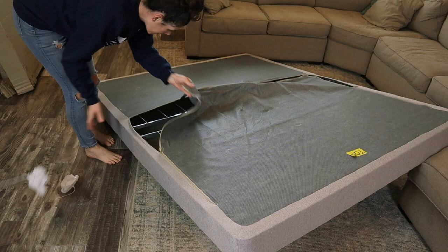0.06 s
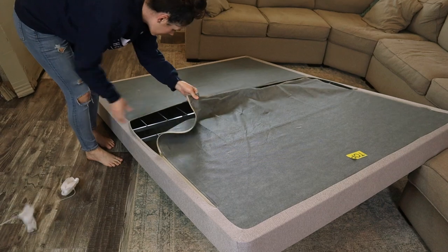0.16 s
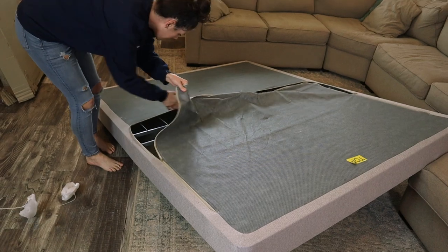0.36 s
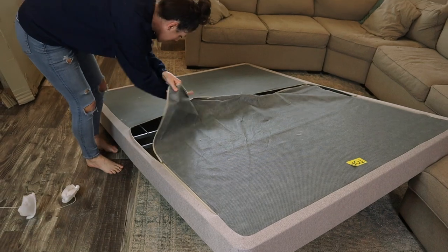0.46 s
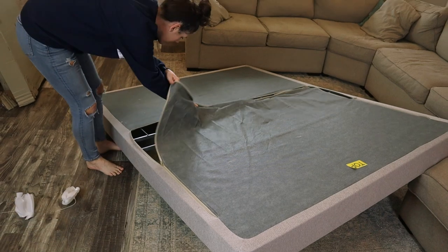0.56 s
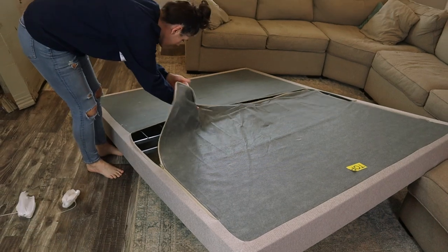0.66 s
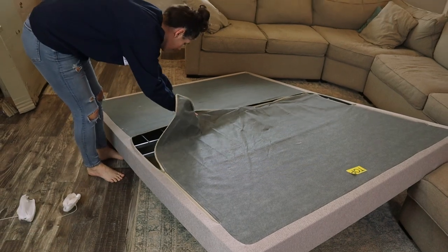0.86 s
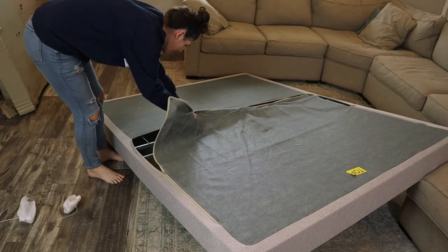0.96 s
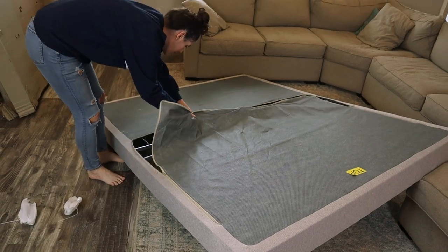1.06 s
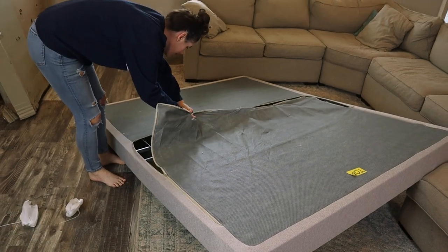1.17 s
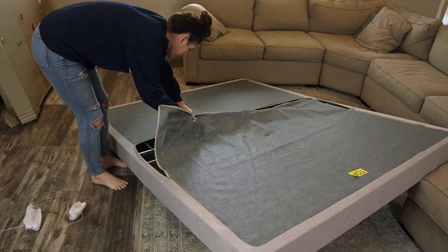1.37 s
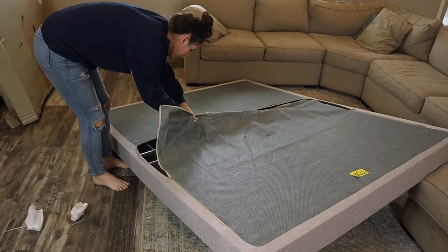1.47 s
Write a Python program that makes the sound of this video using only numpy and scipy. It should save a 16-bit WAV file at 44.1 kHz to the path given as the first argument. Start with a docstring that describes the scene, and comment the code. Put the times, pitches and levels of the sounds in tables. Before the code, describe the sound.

One dull, dry thump of something dropped on wood, then a cloth cover rustles softly.

```python
"""A brief rustle of cloth, then a dull, dry thump: a small soft item drops on a wooden floor.
Item and floor ring briefly; the item flops over with a short scuff and makes a small bounce.
Close by, someone handles the cloth cover of a bed base: it swishes as it slides, crinkles as it
folds and bumps softly on the frame. A tiny piece of metal tinkles, over quiet room noise."""
import sys
import numpy as np
from scipy import signal
from scipy.fft import rfft, irfft
from scipy.io import wavfile
from scipy.ndimage import uniform_filter1d

SR = 44100
rng = np.random.default_rng(int(sys.argv[2]) if len(sys.argv) > 2 else 0)


def unload_wav(signal):
    """Save mono or channel-first audio to the path in sys.argv[1] as 16-bit WAV at rate SR, clipped to [-1, 1]."""
    wavfile.write(
        sys.argv[1],
        SR,
        np.round(np.clip(np.atleast_2d(signal).T, -1, 1) * 32767).astype(np.int16),
    )


N = 66150  # 1.5 s

# The item's hits on the floor (time [s], level [dB], length of push [s])
LANDING_HITS = [(0.1545, -17.5, 0.0015), (0.159, -11.5, 0.0017), (0.1612, -9, 0.00051), (0.1631, 0, .0007),
                (0.1683, -8, 0.0007), (0.1761, -15.5, .0006), (0.1845, -27.5, 0.0004),
                (0.1888, -15.5, 0.00023), (0.1954, -24.5, 0.0019)]
# Ringing notes of item and floor (pitch [Hz], level [dB], time to fade by 60 dB [s])
THUMP_NOTES = [(199, -5.5, 0.043), (316.5, -8, 0.073), (457, 2, 0.022), (570, -21, 0.031),
               (866, -10.5, 0.043), (1200, -23, 0.082), (2040, -10.5, 0.0088)]
# Tone of the hits' sharp edge (frequency [Hz], level [dB])
CRACK_TONE = [(400, -16), (1800, 6), (3500, 0.5), (6500, -8.5), (16000, -23.5)]
def thump():
    """The item lands in a quick run of pushes that ring the floor; harder ones crack louder."""
    force = sum(undb(db) * push(s, length) for s, db, length in LANDING_HITS)
    contact = sum(undb(1.06 * db) * fade(s, decay=0.0017) for s, db, _ in LANDING_HITS)
    return undb(-2.5) * ring(force, THUMP_NOTES) + undb(-14.5) * contact * noise(CRACK_TONE)


# Tones of the dull rub, bright skid and last low thud (frequency [Hz], level [dB])
RUB_TONE = [(40, -1.5), (140, 3), (400, 0), (720, -8), (940, 3.5), (1200, -5), (1480, -7.5), (2300, -10.5),
            (3500, -18), (6000, -30.5), (16000, -57)]
SKID_TONE = [(500, -31.5), (2500, -1), (5000, 1), (8000, -5), (16000, -11)]
SETTLE_TONE = [(20, -15.5), (60, -3.5), (130, -10), (250, -18), (3000, -59.5)]
def scuff():
    """The item flops over and skids; the rubbing brightens, then it settles with a low thud."""
    rub = undb(-15) * swell(0.1847, rise=0.0047, fall=0.008) * noise(RUB_TONE)
    skid = undb(-26.5) * swell(0.1905, rise=0.0022, fall=0.0068) * noise(SKID_TONE)
    settle = undb(-22.5) * swell(0.198, rise=0.0014, fall=0.003) * noise(SETTLE_TONE)
    return rub + skid + settle


# Slaps of the small bounce (time [s], level [dB])
BOUNCE_SLAPS = [(0.3151, -33), (0.3281, -41.5)]
# Tone of a slap (frequency [Hz], level [dB])
SLAP_TONE = [(50, -9), (220, 0), (1100, -1.5), (1900, -12), (5500, -8.5), (9000, -16.5), (16000, -10)]
def bounce():
    """The item comes down again with light slaps, each trailing off in a scuff."""
    loudness = sum(undb(db) * (fade(s, decay=0.0042) + undb(-9.5) * fade(s, decay=0.022))
                   for s, db in BOUNCE_SLAPS)
    return loudness * noise(SLAP_TONE)


# Loudness of the moving cover (time [s], level [dB])
COVER_MOTION = [(0, -47.5), (0.101, -49.5), (.28, -54), (.37, -47.5), (.45, -53), (.56, -54), (.76, -51.5),
                (.85, -55), (1.06, -58.5), (1.191, -55), (1.32, -59), (1.5, -69)]
# Strokes of sliding cloth (peak time [s], level [dB], rise [s], fall [s])
COVER_STROKES = [(0.083, -43.5, 0.025, 0.018), (0.144, -40.5, 0.033, 0.0088), (.213, -43.5, 0.0059, 0.037),
                 (0.321, -47.5, 0.011, 0.022), (0.598, -42, 0.02, 0.041), (.715, -51, 0.02, 0.013),
                 (.99, -56.5, 0.15, 0.04), (1.195, -53.5, 0.014, 0.039)]
# Tones of rustling, creasing, sliding and a brushing sleeve (frequency [Hz], level [dB])
RUSTLE_TONE = [(30, -30.5), (70, -11), (140, -8), (290, 1), (420, -7), (620, -7.5), (1000, -14.5),
               (2000, -21), (5000, -25), (16000, -29)]
CREASE_TONE = [(600, -3), (1900, 7), (7000, -16.5)]
SWISH_TONE = [(300, -3), (900, -8), (2000, -5.5), (3500, -6.5), (7500, -2), (10500, -5.5), (12500, -1.5),
              (14500, 2), (16000, 1.5)]
SLEEVE_TONE = [(1000, -12.5), (4200, -6), (5400, -3), (9000, -12)]
def cloth():
    """The cover rustles and creases as it moves, and hisses as it slides; a sleeve brushes it."""
    motion = undb(np.interp(since(0), *np.array(COVER_MOTION).T))
    rustle = noise(RUSTLE_TONE) * flicker(spread_db=1, per_s=50.18)
    strokes = sum(undb(db) * swell(s, rise, fall) for s, db, rise, fall in COVER_STROKES)
    hiss = noise(SWISH_TONE) * flicker(spread_db=2, per_s=300)
    hiss += undb(-12.5) * colour(crinkles(), SWISH_TONE)
    creases = undb(-13.5) * colour(crinkles(), CREASE_TONE)
    sleeve = undb(-54) * swell(1.081, rise=0.041, fall=0.041) * noise(SLEEVE_TONE)
    return motion * (rustle + creases) + strokes * hiss + sleeve


def crinkles(per_s=360, spread_db=3):
    """Crinkling cloth makes tiny clicks of uneven size at random moments."""
    clicks = (rng.random(N) < per_s / SR) * rng.standard_normal(N)
    return clicks * undb(spread_db * np.minimum(rng.exponential(size=N), 3))


# Soft bumps of cloth and frame (time [s], level [dB], fade time [s])
NUDGES = [(.04, -35.5, 0.015), (0.059, -42.5, 0.017), (0.3172, -44, 0.023), (0.508, -46.5, 0.029),
          (0.569, -57, 0.0083), (.648, -47, 0.0096), (.706, -38, 0.0095), (0.793, -49, 0.007),
          (0.9784, -43.5, 0.012), (1.139, -46.5, 0.013), (1.408, -53.5, 0.018)]
# Ringing notes of the bed frame (pitch [Hz], level [dB], time to fade by 60 dB [s])
FRAME_NOTES = [(175.3, -5.5, 0.056), (272.7, -3, 0.053), (442, -10, 0.017)]
# Tone of the shuffling cover (frequency [Hz], level [dB])
SHUFFLE_TONE = [(30, -28), (70, -13), (130, 7.5), (280, 7.5), (550, 1.5), (900, -10.5), (2000, -14.5),
                (5000, -22.5), (16000, -48)]
def bumps():
    """At each nudge the frame gives a soft knock and the cover shuffles after it."""
    force = sum(undb(db) * push(s, length=0.0014) for s, db, _ in NUDGES)
    rise_s = 0.0013
    shuffle = sum(undb(db) * (fade(s, decay) - fade(s, rise_s)) for s, db, decay in NUDGES)
    return undb(1.5) * ring(force, FRAME_NOTES) + shuffle * noise(SHUFFLE_TONE)


# Snapping folds (time [s], level [dB], centre [Hz], half-width [octaves], fade time [s])
FOLD_SNAPS = [(.0097, -35, 10000, 1.1, 0.00089), (.0203, -38.5, 2570, 0.67, 0.0043),
              (0.3022, -30.5, 12100, 0.35, 0.0018), (0.3057, -29.5, 12740, 0.13, 0.0031),
              (0.3263, -16, 12500, 0.18, 0.00022), (0.758, -38, 5600, 1.5, 0.00049),
              (.801, -37, 6760, 4.4, 0.0011), (1.275, -39, 10000, 1.3, 0.00039),
              (1.43, -41, 13900, 0.56, 0.001)]
# Tone of a snap (distance from its centre [half-widths], level [dB])
SNAP_SHAPE = [(-8, -38), (-3, -16), (-1, -4), (0, 0), (1, -4), (2, -13), (4, -26)]
def snaps():
    """Folds of stiff cloth give way in very short bursts."""
    sound = 0
    for s, db, hz, width, decay in FOLD_SNAPS:
        loudness = fade(s, decay)
        tone = [(hz * 2 ** (width * distance), level) for distance, level in SNAP_SHAPE]
        burst = colour(loudness * rng.standard_normal(N), tone)
        sound += undb(db) * np.sqrt(np.mean(loudness ** 2)) * burst
    return sound


# Clicks of item, cover and frame (time [s], level [dB], length of push [s])
DRY_CLICKS = [(0.3152, -8.5, 0.00011), (.4839, -14.5, 0.00013), (.74, -29, 0.000089), (0.775, -13, 0.00037),
              (.783, -10.5, 0.00053), (1.409, -24, 0.00016)]
def ticks(low_cut_hz=503):
    """Quick touches make dry clicks; the shorter the touch, the brighter the click."""
    force = sum(undb(db) * push(s, length) for s, db, length in DRY_CLICKS)
    return cut_bass(force, low_cut_hz)


# Taps on the metal piece (time [s], level [dB])
METAL_TAPS = [(0.232, -45), (0.2533, -37), (0.8602, -38.5)]
# Its ringing notes (pitch [Hz], level [dB], time to fade by 60 dB [s])
METAL_NOTES = [(4960, -11.5, 0.045), (5240, -16, 0.051), (12200, -22, 0.02), (12780, 2, 0.054)]
def tinkles():
    """The metal piece is tapped and briefly scraped; it chatters as it rings."""
    taps, contact = np.zeros(N), 0
    for s, db in METAL_TAPS:
        taps[int(s * SR)] += undb(db)
        contact += undb(db) * fade(s, decay=0.0015)
    scrape = swell(0.264, rise=0.01, fall=0.01)
    force = taps + undb(-62.5) * scrape * rng.standard_normal(N)
    bright_hiss = noise([(3000, -25), (9000, -7), (13500, 3)])
    grit = (undb(-22) * contact + undb(-42) * scrape) * bright_hiss
    return (ring(force, METAL_NOTES) + grit) * flicker(spread_db=3, per_s=700)


# Tone of the room's background (frequency [Hz], level [dB])
ROOM_TONE = [(30, -33), (70, -12.5), (150, -11), (300, -14.5), (700, -18.5), (1400, -11), (3000, -15),
             (5000, -13.5), (10000, -19), (15500, -12)]
def room():
    """A faint, steady hiss fills the room."""
    return undb(-56.5) * noise(ROOM_TONE)


def undb(db):
    """Turn decibels into a volume multiplier."""
    return 10 ** (np.asarray(db) / 20)


def unit(x):
    """Scale to an average strength (rms) of 1."""
    return x / np.sqrt(np.mean(x ** 2) + 1e-20)


def since(start):
    """Seconds since a moment, for every sample."""
    return np.arange(N) / SR - start


def colour(x, tone):
    """Shape a sound's lows and highs with a tone table, at strength 1."""
    hz, db = np.array(tone, float).T
    freqs = np.maximum(np.arange(N // 2 + 1) * SR / N, 1)
    gain = undb(np.interp(np.log(freqs), np.log(hz), db))
    return unit(irfft(rfft(x) * gain, N))


def noise(tone):
    """Noise with the given tone, at strength 1."""
    return colour(rng.standard_normal(N), tone)


def flicker(spread_db, per_s):
    """A volume that wanders smoothly at random."""
    hold = int(SR / per_s)
    steps = np.repeat(rng.standard_normal(N // hold + 1), hold)[:N]
    return undb(spread_db * unit(uniform_filter1d(steps, hold)))


def swell(peak, rise, fall):
    """A rounded rise and fall around a moment, all in seconds."""
    t = since(peak)
    return np.exp(-.5 * (t / np.where(t < 0, rise, fall)) ** 2)


def fade(start, decay):
    """A sudden start that dies away, to 37% after decay seconds."""
    t = since(start)
    return (t >= 0) * np.exp(-np.maximum(t, 0) / decay)


def push(start, length):
    """One rounded push whose samples add up to 1."""
    force = np.sin(np.pi * np.clip(since(start) / length, 0, 1))
    return force / force.sum()


def ring(force, notes):
    """A force sets an object's own notes ringing; each dies away."""
    t = since(0)
    response = sum(undb(db) * np.cos(2 * np.pi * hz * t) * undb(-60 * t / fade_s)
                   for hz, db, fade_s in notes)
    return signal.fftconvolve(force, response)[:N]


def cut_bass(x, hz):
    """Turn down everything below a frequency."""
    return signal.sosfilt(signal.butter(2, hz, "highpass", fs=SR, output="sos"), x)


def scene():
    """All sounds are close and free of echo, in one channel."""
    mix = thump() + scuff() + bounce() + cloth() + bumps() + snaps() + ticks() + tinkles() + room()
    return mix[None, :]


def record(dry):
    """Drop the deep bass, flatten peaks past full scale and cut the highest treble."""
    low_hz, top_hz = 50, 15800
    clipped = np.clip(cut_bass(dry, low_hz), -1, 1)
    return signal.sosfilt(signal.ellip(10, .2, 80, top_hz, fs=SR, output="sos"), clipped)


dry = scene()
out = record(dry)
unload_wav(out)
```